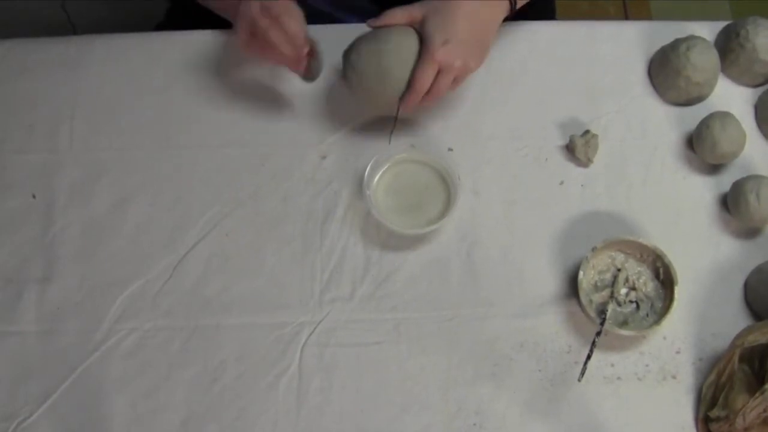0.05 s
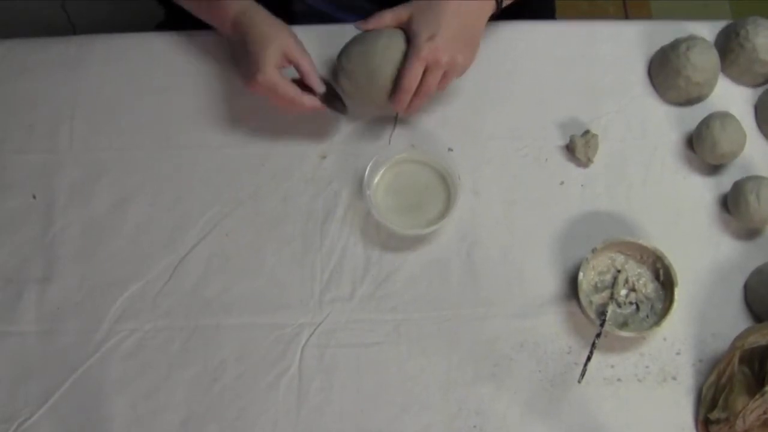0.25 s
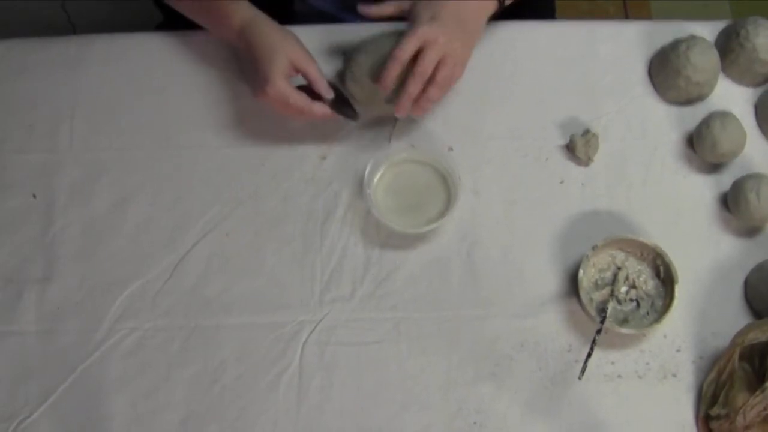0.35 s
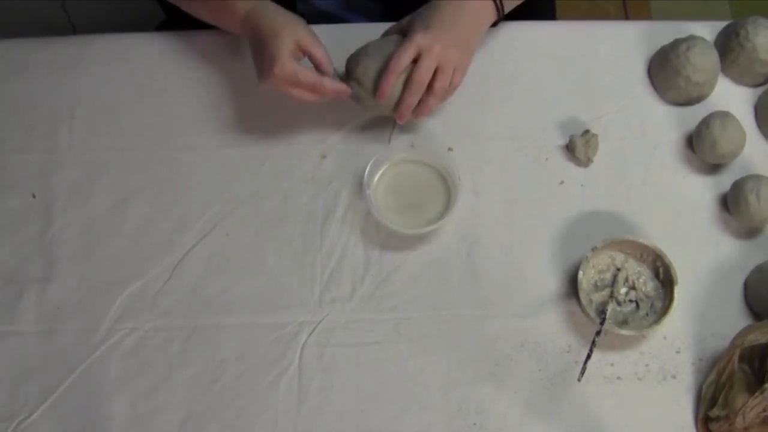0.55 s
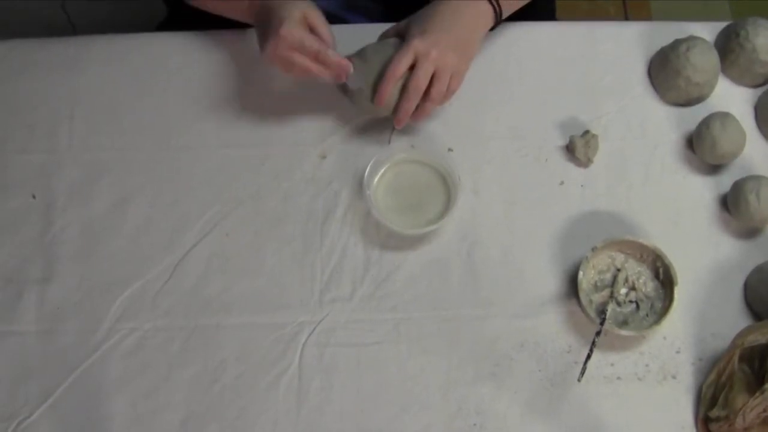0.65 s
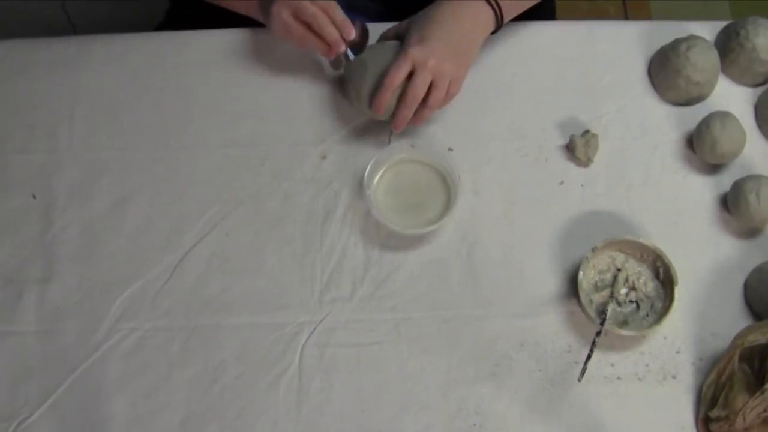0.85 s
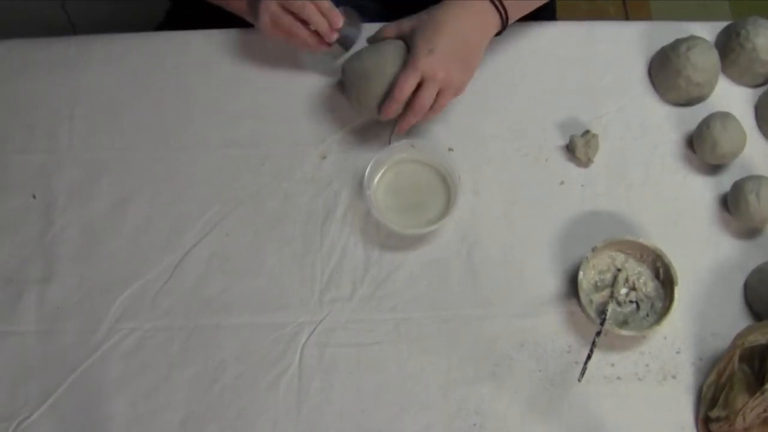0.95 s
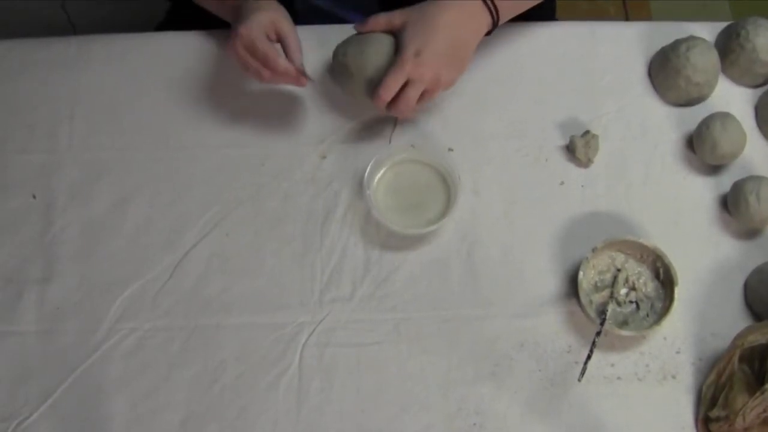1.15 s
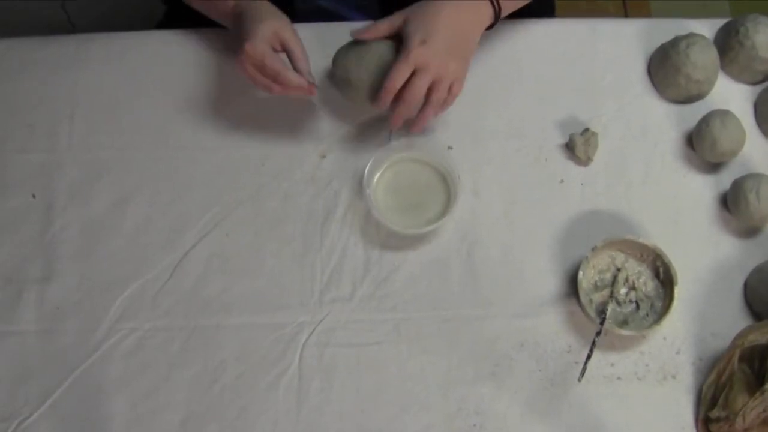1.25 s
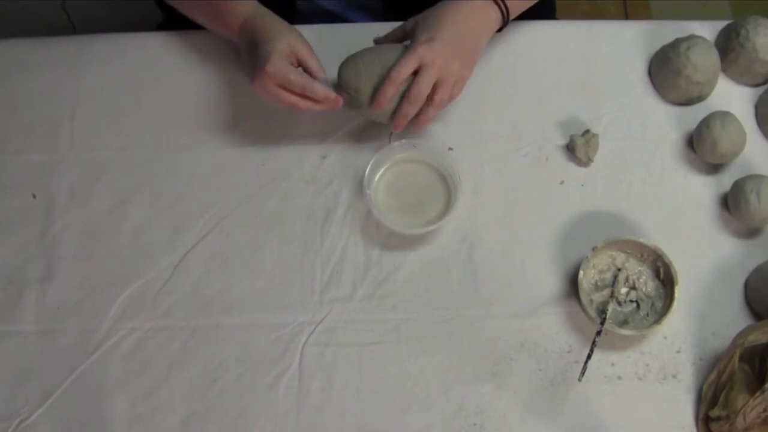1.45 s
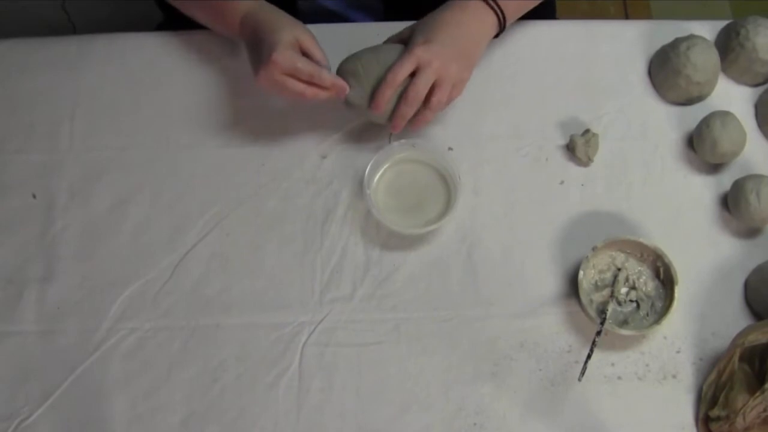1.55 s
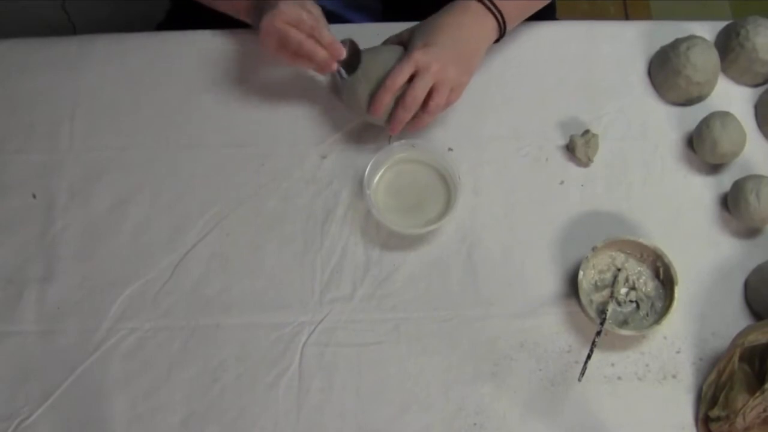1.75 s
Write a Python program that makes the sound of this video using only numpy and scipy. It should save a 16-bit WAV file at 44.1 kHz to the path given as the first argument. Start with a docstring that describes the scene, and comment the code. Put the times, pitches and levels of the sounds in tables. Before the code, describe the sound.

A hard scraper clacks and scrapes on a clay pot that thuds onto a table.

```python
"""Scraping a clay pot

In a small, quiet room with a low drone, a damp clay pot is set down twice on a cloth-covered table.
Each time the table thuds, a hard scraper clacks at the pot's foot and the hollow pot gives a low bump.
In between, the scraper ticks on the pot's wall and is drawn up it, catching on grit as it goes.
Sand grains under its edge make a faint hiss, strongest during that stroke."""
import sys
import numpy as np
from scipy import signal
from scipy.fft import rfft, irfft
from scipy.io import wavfile

SR = 44100
rng = np.random.default_rng(int(sys.argv[2]) if len(sys.argv) > 2 else 0)


def to_wav(sig):
    """Store sig (one row per channel, or 1-D mono) as 16-bit WAV at the path in sys.argv[1].

    Samples outside -1..1 are clipped; the rate is SR.
    """
    pcm = np.clip(np.atleast_2d(sig), -1, 1) * 32767
    pcm = np.round(pcm).astype(np.int16)
    wavfile.write(sys.argv[1], SR, pcm.T)  # frames by channels


N = 79380

# Levels are relative. A fade time is how long a ring takes to drop 60 dB.
# A hit with more bandwidth is shorter and sounds harder.
# tone of the room's low noise: f/Hz, level/dB
RUMBLE_TONE = [(22, -10.5), (50, -2.5), (90, -4), (130, -11.5), (165, -7), (200, -13.5), (240, -11.5),
               (320, -11.5), (420, -17), (700, -17.5), (1000, -19), (1600, -54)]
# tone of the room's hiss and of the grit under the pot: f/Hz, level/dB
HISS_TONE = [(700, -9), (1100, 0.5), (2000, -2), (4000, -9), (8000, -19), (11500, -20.5), (13000, -32),
             (15500, -35)]
# how the drone swells and sinks: t/s, level/dB
DRONE_LEVEL = [(0.0, -49), (0.264, -56.5), (0.31, -58), (0.416, -47), (0.666, -65), (1.17, -57),
               (1.188, -42.5), (1.322, -63), (1.392, -49.5), (1.8, -61)]
# the pot lands or rocks: t/s, level/dB, bandwidth/Hz, grit level/dB
THUDS = [(0.2313, -19.5, 832, -50), (0.39, -30, 200, -80), (1.177, -19, 1130, -48)]
# notes of the table with the pot on it: f/Hz, level/dB, fade time/s
TABLE_MODES = [(141.5, -21, 0.19), (167, -24, 0.53), (267.8, -14, 0.038), (274.5, -24, 0.14),
               (316, 2.5, 0.014), (394.4, -56, 0.24), (549, -12, 0.037), (760, -21, 0.083),
               (1054, -19, 0.041)]
# scraper knocks: t/s, level/dB, bandwidth/Hz, place on the blade (0-1), fade time factor,
# grit level/dB, treble tilt/(dB per octave)
CLACKS = [(0.2806, -26.5, 1310, 1, 1.15, -75, 0), (0.3060, -27, 1510, 1, 1.26, -68, 5),
          (0.3421, -15.5, 6900, 0.98, 0.97, -40.5, 0.5), (0.3689, -15.5, 5000, 0.88, 1.04, -47, -1.5),
          (0.374, -23.5, 3050, 1, 0.88, -55, -1), (0.4090, -18, 6900, 0.99, 1.1, -41, 2),
          (0.999, -41, 2000, 1, 0.93, -73, 11), (1.2523, -27, 1430, 1, 0.96, -66, 4),
          (1.275, -29, 6940, 0.94, 0.79, -54, 5.5), (1.2881, -14, 1860, 1, 0.91, -47.5, -2),
          (1.311, -30, 3520, 0.88, 0.81, -64, -12), (1.3536, -27, 5970, 0.98, 0.96, -56, -2)]
# notes of the scraper: f/Hz, level/dB, fade time/s, left over right/dB
SCRAPER_MODES = [(817, -19.5, 0.036, 7.5), (1035, -10.5, 0.027, -2), (1257.5, -8.5, 0.062, -0.5),
                 (1382, -5.5, 0.048, -3), (1538, -1.5, 0.06, 1), (1728, -6.5, 0.06, -1),
                 (1984, -14, 0.034, 5), (2127, -9, 0.024, -10), (2375, -2.5, 0.027, -4),
                 (2660, -12, 0.011, 1), (3082, -7.5, 0.021, 0), (3930, -17.5, 0.014, 2),
                 (5400, -22.5, 0.029, -5), (6330, -24, 0.02, -2)]
# the scraper skids just before it lands: t/s, length/s, level/dB
SKIDS = [(0.329, 0.014, -47), (0.397, 0.01, -40), (1.275, 0.0088, -43.5), (1.303, .024, -50)]
# tone of grit cracking under the scraper: f/Hz, level/dB
CRACK_TONE = [(600, -8), (2000, 2), (3500, 3), (4600, -4), (5700, 0.5), (7500, -7.5), (9800, -1),
              (12000, -9), (14000, -11), (16000, -15)]
# the scraper's glassy top notes, rung by grit: f/Hz, level/dB, fade time/s
CLINK_MODES = [(9570, -33, .015), (13840, -33, .03)]
# the scraper bumps the pot's foot: t/s, level/dB, bandwidth/Hz
BUMPS = [(0.3448, -35, 450), (0.3713, -32.5, 930), (0.4116, -28.5, 430), (1.2895, -33, 660)]
# notes of the hollow pot: f/Hz, level/dB, fade time/s
POT_MODES = [(125, -9, 0.061), (242, -1.5, 0.073), (302, -4.5, 0.051), (498, -5, 0.048)]
# the scraper's pressure on the wall, heard as hiss: t/s, level/dB
STROKE_LEVEL = [(0, -63.5), (.08, -71), (.48, -67.5), (.6, -65), (0.662, -59), (.76, -63), (0.869, -59.5),
                (.905, -58), (.95, -63), (1.0, -69), (1.102, -69.5), (1.56, -70), (1.66, -65),
                (1.731, -62.5), (1.8, -64.5)]
# tone of that hiss: f/Hz, level/dB
SCRAPE_TONE = [(400, -17), (1000, 0), (1800, 3), (3000, 2), (4700, 1.5), (9000, -2.5), (12000, -6.5),
               (15500, -23.5)]
# the edge catches on grit: t/s, length/s, level/dB
CATCHES = [(0.644, 0.0021, -45), (0.649, 0.0022, -48.5), (0.912, 0.0051, -49.5), (0.92, 0.015, -51),
           (0.933, 0.011, -45.5)]
# high notes of the catching edge: f/Hz, level/dB, fade time/s
EDGE_MODES = [(4250, -25, 0.0085), (5210, -20, 0.0087)]
# short notes of the pot's wall: f/Hz, level/dB, fade time/s
WALL_MODES = [(1877, -5.5, 0.13), (2030, -0.5, 0.043), (2790, 0, 0.035), (4740, -20, .012),
              (7820, 11.5, .008)]
# first echoes of thuds and bumps: left delay/s, right delay/s, level/dB
THUD_ECHOES = [(.0107, .0107, -9), (.0184, .0185, -9.5), (.0218, .0219, -17)]
# first echoes of clacks and the tick: left delay/s, right delay/s, level/dB
CLACK_ECHOES = [(.0023, .0027, -11.5), (.0067, .0066, -8), (0.0132, .0131, -18)]
# how long the room rings: f/Hz, fade time/s
ROOM_FADE = [(100, 0.93), (300, 0.43), (700, 0.55), (1400, 0.28), (3000, 0.11), (12000, 0.064)]
# how alike the room sounds on the left and right: f/Hz, likeness (0-1)
LIKENESS = [(30, 0.83), (90, 0.96), (280, 0.54), (600, 0.06), (1500, 0.092), (12000, 0.088)]

TIME = np.arange(N) / SR   # t/s of each sample
FREQS = np.arange(N // 2 + 1) * SR / N   # f/Hz of each slot in a spectrum


def from_db(db):
    """Turn decibels into a number to multiply by."""
    return 10 ** (np.asarray(db) / 20)


def rms_one(x):
    """Scale a sound so its average strength (rms) is 1."""
    return x / np.sqrt(np.mean(x ** 2) + 1e-20)


def at_hz(points, hz):
    """Read between a table's rows, giving each octave equal space."""
    freqs, values = np.transpose(points)
    return np.interp(np.log(np.maximum(hz, 1)), np.log(freqs), values)


def colour(x, tone):
    """Shape a sound with a tone table, fading out the bass below its first row."""
    bass_fade = np.minimum(FREQS / tone[0][0], 1) ** 2
    return irfft(rfft(x) * from_db(at_hz(tone, FREQS)) * bass_fade, N)


def stereo_noise():
    """Noise arriving from all around: left and right are most alike in the bass."""
    alike = np.clip(at_hz(LIKENESS, FREQS), 0, 1)
    mid, side = rfft(rng.standard_normal((2, N)))
    return irfft(np.sqrt(1 + alike) * mid + np.sqrt(1 - alike) * side * [[1], [-1]], N) / np.sqrt(2)


def background():
    """The room's low noise and wavering drone, with a soft hiss."""
    lowpass = signal.butter(2, 1000, fs=SR, output="sos")
    rumble = rms_one(signal.sosfilt(lowpass, colour(stereo_noise(), RUMBLE_TONE)))
    drone_hz, width_hz = 92.35, 2.9
    narrow_band = rfft(rng.standard_normal(N)) / (1 + (2 * (FREQS - drone_hz) / width_hz) ** 2)
    waver = signal.hilbert(irfft(narrow_band, N))
    drone = rms_one(waver.real / np.sqrt(np.abs(waver) ** 2 + np.mean(waver.real ** 2)))   # evened out
    drone_level = from_db(np.interp(TIME, *np.transpose(DRONE_LEVEL)) - 2)
    hiss = rms_one(colour(stereo_noise(), HISS_TONE))
    return from_db(-51) * rumble + drone_level * drone + from_db(-61) * hiss


def contact(start, bandwidth_hz):
    """The brief push of one hit, adding up to 1; a softer hit lasts longer."""
    age = np.maximum(TIME - start, 0) * 2 * np.pi * bandwidth_hz
    pulse = age ** 3 * np.exp(-np.minimum(age, 80))
    return pulse / pulse.sum()


def ring(force, modes):
    """A struck object rings at its own notes (modes), each a fading sine wave."""
    out = 0
    for hz, db, fade_s in modes:
        decay = np.exp(-np.log(1000) / (fade_s * SR))
        step = 2 * np.pi * hz / SR
        feedback = [1, -2 * decay * np.cos(step), decay * decay]
        out = out + from_db(db) * signal.lfilter([0, np.sin(step)], feedback, force + 1e-18)
    return out


def crack(start, decay_s=0.004):
    """Loudness of grit crushed by a hit: it jumps up and dies fast."""
    age = TIME - start
    return (age >= 0) * np.exp(-np.abs(age) / decay_s)


def echoes(x, paths):
    """Nearby surfaces send back late, quieter copies of the left and right sound."""
    out = 0
    for left, right, db in paths:
        late = [np.interp(TIME - delay, TIME, side, left=0) for delay, side in zip((left, right), x)]
        out = out + from_db(db) * np.array(late)
    return out


def room(x, wet_db, onset_s=0.0096):
    """Many echoes blur into a tail that dies faster in the treble."""
    noise = rfft(stereo_noise())
    centres_hz = np.geomspace(60, 15360, 9)
    tail = 0
    for hz, share in zip(centres_hz, np.eye(len(centres_hz))):
        band = irfft(noise * np.interp(np.log(FREQS + 1), np.log(centres_hz), share), N)
        tail = tail + band * np.exp(-np.log(1000) * TIME / at_hz(ROOM_FADE, hz))
    tail = tail * np.clip(TIME / onset_s - .5, 0, 1) / np.sqrt(.01 * SR)
    return from_db(wet_db) * signal.fftconvolve(np.atleast_2d(x), tail, axes=1)[:, :N]


def pot_thuds(knock_share_db=-17):
    """The soft, heavy pot thuds on the table; the scraper's knocks shake the table too."""
    force = sum(from_db(db) * contact(start, hz) for start, db, hz, _ in THUDS)
    force += sum(from_db(db + knock_share_db) * contact(start, hz) for start, db, hz, *_ in CLACKS)
    bass_cut = signal.butter(2, 162, "high", fs=SR, output="sos")   # the table gives off little deep bass
    thud = signal.sosfilt(bass_cut, ring(force, TABLE_MODES))
    cracks = sum(from_db(db) * crack(start) for start, _, _, db in THUDS)
    grit = cracks * rms_one(colour(stereo_noise(), HISS_TONE))
    direct = thud * from_db([[.6], [-.6]]) + grit   # the thud sits slightly left
    return direct + echoes(direct, THUD_ECHOES) + room(thud, wet_db=-6.5)


def knock(start, db, bandwidth_hz, place, fade_factor, tilt_db):
    """One hit on the scraper: where it lands sets each note's share, and the grip damps the ring."""
    force = from_db(db) * contact(start, bandwidth_hz)
    loudest_hz = max(SCRAPER_MODES, key=lambda mode: mode[1])[0]
    out = 0
    for k, (hz, mode_db, fade_s, pan_db) in enumerate(SCRAPER_MODES):
        mode = (hz, mode_db + tilt_db * np.log2(hz / loudest_hz), fade_s * fade_factor)
        left_right = from_db([[pan_db / 2], [-pan_db / 2]])
        out = out + np.cos(np.pi * k * place) * left_right * ring(force, [mode])
    return out


def swell(start, length):
    """A short rise and fall in loudness."""
    return np.exp(-(2 * (TIME - start) / length - 1) ** 2)


def grains(per_second=7000, spread_db=1.5):
    """Sand grains tick at random, a few of them louder than the rest."""
    sizes = from_db(spread_db * np.minimum(rng.exponential(1, N), 4)) * rng.choice([-1, 1], N)
    return rms_one(sizes * (rng.random(N) < per_second / SR))


def blade_ring(sand):
    """Sand jolts the scraper's tip, where each note swings opposite to the one before."""
    jolts = np.diff(sand, prepend=0)
    return rms_one(sum((-1) ** k * ring(jolts, [mode[:3]]) for k, mode in enumerate(SCRAPER_MODES)))


def scraper_clacks():
    """The scraper skids and knocks, and grit cracks under it."""
    knocks = sum(knock(start, db, hz, place, fade, tilt) for start, db, hz, place, fade, _, tilt in CLACKS)
    skids = sum(from_db(db) * swell(start, length) for start, length, db in SKIDS)
    cracks = sum(from_db(grit_db) * crack(start) for start, *_, grit_db, _ in CLACKS)
    crunch = (cracks + from_db(-22) * skids) * rms_one(colour(stereo_noise(), CRACK_TONE))
    grit = crunch + ring(cracks * grains(), CLINK_MODES)
    ringing = from_db(-4) * knocks + skids * blade_ring(grains())
    direct = ringing + grit
    return direct + echoes(direct, CLACK_ECHOES) + room(ringing, wet_db=-19) + room(grit, wet_db=-4)


def pot_bumps():
    """The firmest knocks push on into the pot, which answers with a low, hollow bump."""
    force = sum(from_db(db) * contact(start, hz) for start, db, hz in BUMPS)
    body = ring(force, POT_MODES)
    return body + echoes([body, body], THUD_ECHOES) + room(body, wet_db=-11.5)


def scrape(stereo_width=0.4):
    """Grains hiss under the edge and faintly ring the blade; each catch rings the edge's high notes."""
    catches = sum(from_db(db) * swell(start, length) for start, length, db in CATCHES)
    level = from_db(np.interp(TIME, *np.transpose(STROKE_LEVEL))) + catches
    sand = grains() + stereo_width * rng.standard_normal(N) * [[1], [-1]]
    hiss = level * (rms_one(colour(sand, SCRAPE_TONE)) + from_db(-39) * blade_ring(sand))
    direct = hiss + ring(catches * grains(), EDGE_MODES)
    return direct + room(direct, wet_db=-1.5)


def wall_tick():
    """The scraper's edge ticks on the clay wall as the stroke begins."""
    force = from_db(-44.5) * contact(start=.6447, bandwidth_hz=10100)
    tick = ring(force, WALL_MODES)
    return tick + echoes([tick, tick], CLACK_ECHOES) + room(tick, wet_db=-19)


def scene():
    """Room, pot and scraper together."""
    return background() + pot_thuds() + scraper_clacks() + pot_bumps() + scrape() + wall_tick()


def record(dry):
    """Cut off the very highest treble, above 15900 Hz."""
    return signal.sosfilt(signal.ellip(10, .2, 80, 15900, fs=SR, output="sos"), dry)


dry = scene()
out = record(dry)
to_wav(out)
```